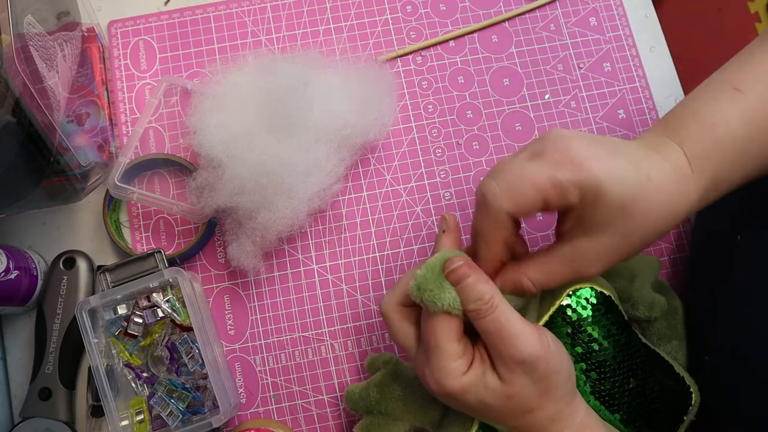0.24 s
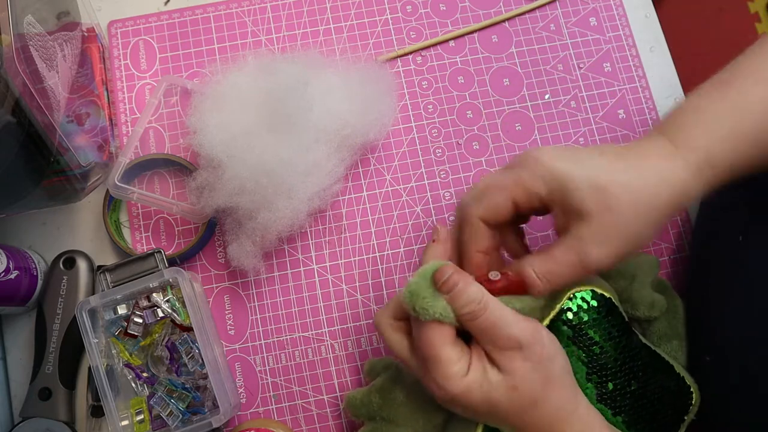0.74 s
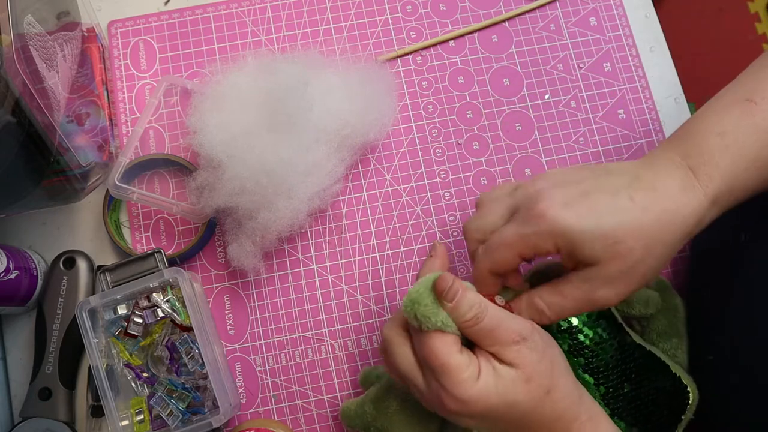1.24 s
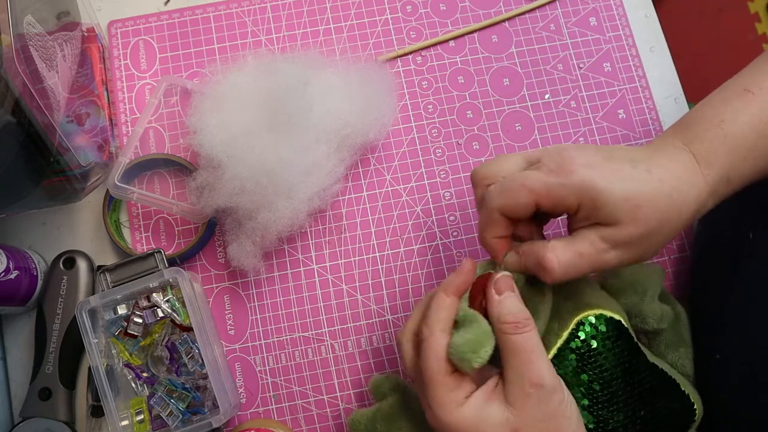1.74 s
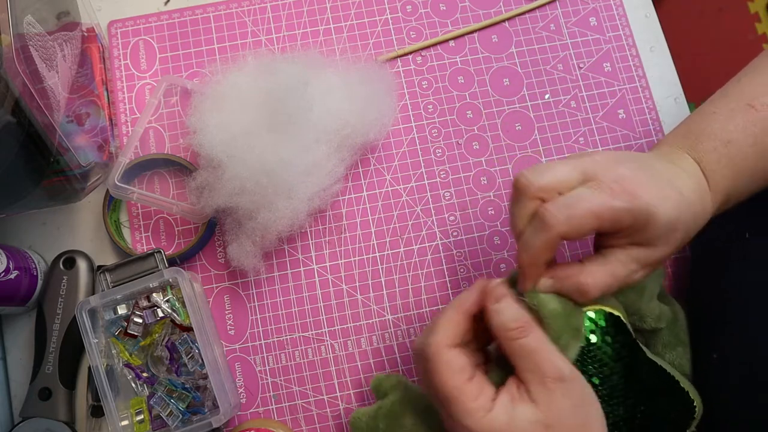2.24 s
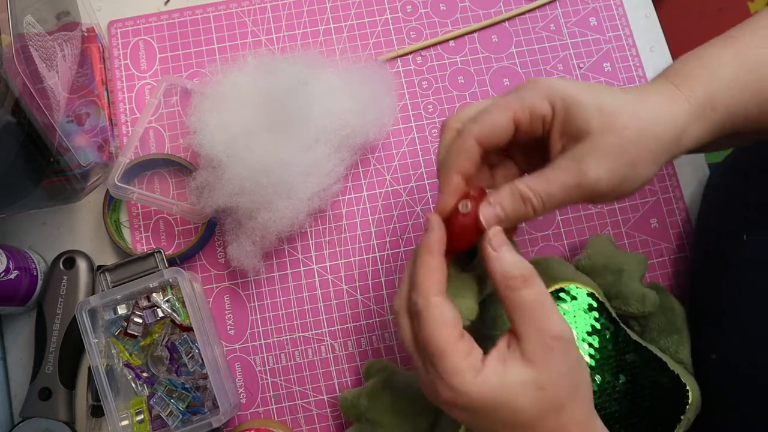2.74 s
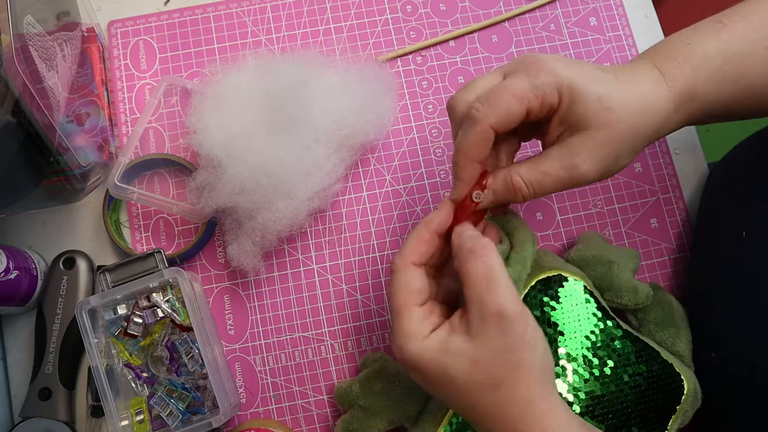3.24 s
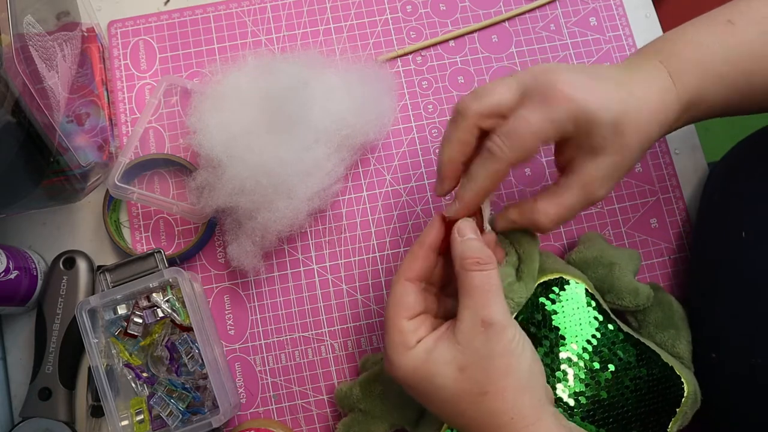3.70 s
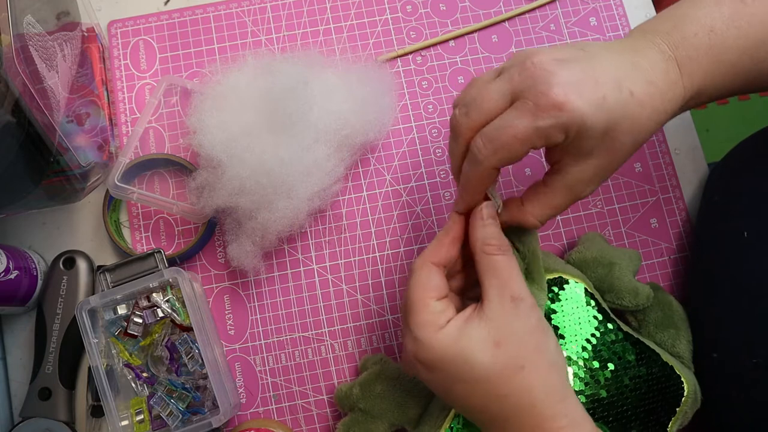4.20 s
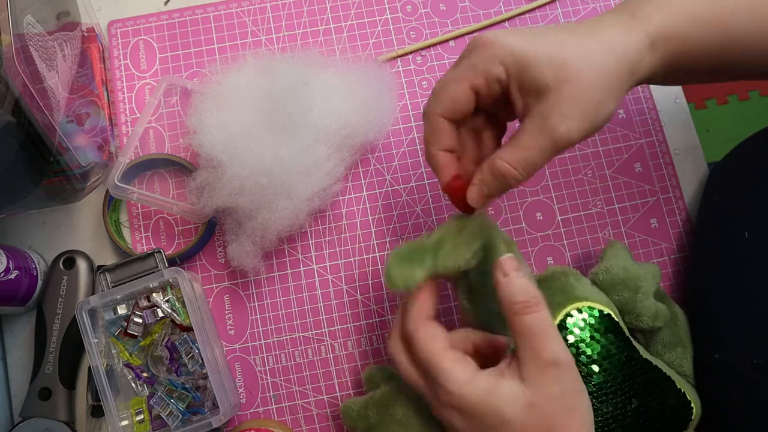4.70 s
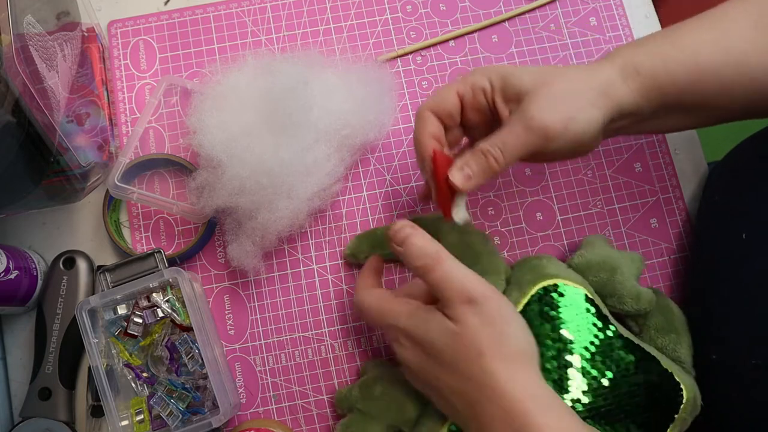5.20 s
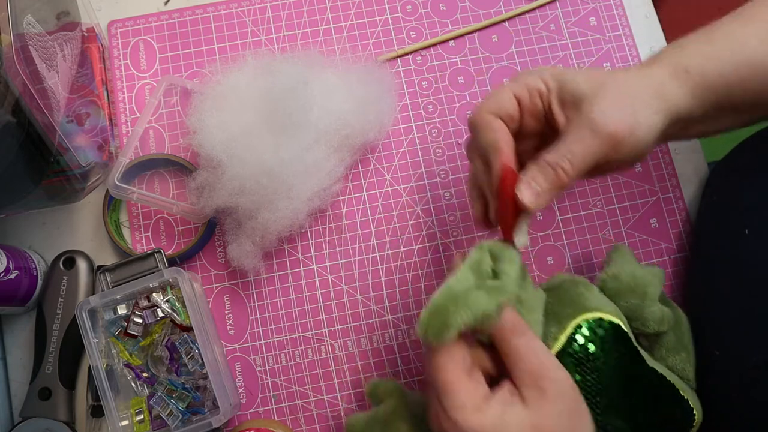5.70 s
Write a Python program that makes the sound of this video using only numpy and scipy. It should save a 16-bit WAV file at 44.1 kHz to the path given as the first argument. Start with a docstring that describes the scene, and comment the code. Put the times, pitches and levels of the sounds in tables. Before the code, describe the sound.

Brief sharp toy squeaks around fingers handling plush and plastic, with faint ticks and fumbling, above a constant low ventilation-like drone.

```python
"""In a small humming room, a toy squeaker is pinched four times close to the microphone; the third runs into a squeal.
Its reed chops the air into sharp pulses that ring the little housing, and leaks hiss where it runs rough.
Plush fabric rustles as noise broken into tiny grains; a plastic clip and the table tick as brief decaying rings.
A ventilation-like hum is shaped noise with narrow droning bands; a limiter ducks it after each squeak."""
import sys
import numpy as np
from scipy import signal
from scipy.fft import rfft, irfft
from scipy.io import wavfile
from scipy.ndimage import uniform_filter1d

SR = 44100
rng = np.random.default_rng(int(sys.argv[2]) if len(sys.argv) > 2 else 0)


def waveform_to_disk(signal):
    """Save audio, clipped to [-1, 1], as 16-bit WAV at the path in sys.argv[1]."""
    frames = np.transpose(np.atleast_2d(signal))
    scaled = np.clip(frames, -1, 1) * 32767
    samples = np.round(scaled).astype(np.int16)
    wavfile.write(sys.argv[1], SR, samples)


N = 262395
TIME = np.arange(N) / SR
TOP_HZ = 15900  # upper limit of the reed's partials and of the recorder


def undb(db):
    """Level law: decibels to amplitude gain."""
    return 10 ** (np.asarray(db) / 20)


def unit(x):
    """Normalisation: scale to rms 1."""
    return x / np.sqrt(np.mean(x ** 2) + 1e-18)


def gains(points, size):
    """Spectral envelope: the gain at each transform bin, interpolated in dB over log frequency."""
    point_hz, point_db = np.transpose(points)
    bin_hz = np.fft.rfftfreq(size, 1 / SR)
    return undb(np.interp(np.log(bin_hz + 1), np.log(point_hz), point_db))


def coloured(points, size):
    """Coloured noise: white noise weighted by a spectral envelope, at rms 1."""
    spectrum = rfft(rng.standard_normal(size))
    return unit(irfft(spectrum * gains(points, size), size))


def ring(x, hz, width_hz):
    """Resonance: one damped mode passes a band around its own frequency."""
    quality = max(hz / width_hz, 1)
    return signal.lfilter(*signal.iirpeak(min(hz, SR / 3), quality, SR), x)


def wander(shape, size):
    """Random modulation: smooth noise of spread 1 that changes over `size` samples."""
    smooth = uniform_filter1d(rng.standard_normal(shape), size)
    return unit(uniform_filter1d(smooth, size))


def add(out, start_s, x):
    """Superposition: mix a sound in at its start time."""
    i = int(start_s * SR)
    out[i:i + len(x)] += x[:len(out) - i]


# spectral density of the room's moving air: pitch_hz [Hz], relative_level_db [dB]
AIR = [(25, -24.5), (42, -22), (72, -4.5), (88, -12), (115, 1.5), (165, 0), (210, -1), (300, -9.5),
       (400, -12.5), (700, -23), (1200, -25.5), (2500, -35.5), (8500, -43.5), (15500, -48)]
AIR_DB = -36.5
# drone bands: centre_hz [Hz], half_width_hz [Hz, half of each resonance's bandwidth], level_db [dB]
DRONES = [(125.07, 6.5, -35.5), (153, 30, -41), (241.1, 16.1, -43), (298.2, 10, -51.5), (435.6, 17, -58),
          (529.8, 20.2, -58)]


def ventilation():
    """Narrow-band noise: moving air rumbles while a few low resonances drone and waver."""
    drone = np.zeros(N)
    for hz, half_width_hz, db in DRONES:
        once = ring(rng.standard_normal(N), hz, 2 * half_width_hz)
        drone += undb(db) * unit(ring(once, hz, 2 * half_width_hz))
    return drone + undb(AIR_DB) * coloured(AIR, N)


# hiss of contact and fibres, shared with the ticks: pitch_hz [Hz], relative_level_db [dB]
HISS = [(500, 4), (2000, -11.5), (5000, -3), (8500, -4), (10000, -10), (15000, -62)]
RUB_WIDTH_SHARE = 1.1  # bandwidth of each resonance over its centre


def fibres(size, hz, treble_db, grain_db=2.5):
    """Stick-slip friction: fibres catch and slip in tiny grains of noise."""
    grains = unit(undb(grain_db * wander(size, size=90)))
    width_hz = hz * RUB_WIDTH_SHARE
    body = unit(ring(ring(rng.standard_normal(size), hz, width_hz), hz, width_hz))
    return (body + undb(treble_db) * coloured(HISS, size)) * grains


# strokes of fingers and plush: middle_s [s], half_length_s [s, from the middle to 1/e],
# level_db [dB], centre_hz [Hz], treble_db [dB, hiss over body]
RUBS = [(0.103, 0.0081, -36, 1110, -12), (0.487, 0.05, -52.5, 2160, -12), (0.591, 0.024, -42, 1140, -18),
        (0.643, 0.013, -37.5, 1600, -12), (0.782, 0.024, -43, 1400, -6.5), (0.978, 0.039, -51.5, 3020, 1),
        (1.461, 0.076, -51, 1210, -1), (3.267, 0.043, -52.5, 6700, -24), (3.634, 0.02, -44.5, 4100, -3),
        (4.273, .072, -60, 3900, -4), (4.537, .03, -56.5, 2500, -2.5), (5.174, 0.035, -61.5, 4940, 8.5),
        (5.393, .03, -43.5, 890, -10), (5.505, 0.03, -51.5, 1490, -5), (5.834, 0.063, -48, 753, -5.5)]
# faint fumbling that runs throughout
FUMBLE_DB, FUMBLE_HZ, FUMBLE_TREBLE_DB, FUMBLE_SWELL_DB = -64.5, 1900, -4.5, 3


def rustle():
    """Envelope-modulated friction: strokes swell and fade over faint, random fumbling."""
    swell = unit(undb(FUMBLE_SWELL_DB * wander(N, size=4400)))
    out = undb(FUMBLE_DB) * swell * fibres(N, FUMBLE_HZ, FUMBLE_TREBLE_DB)
    for middle_s, half_s, db, hz, treble_db in RUBS:
        t = np.arange(-2 * half_s, 2 * half_s, 1 / SR)
        stroke = fibres(len(t), hz, treble_db) * np.exp(-(t / half_s) ** 2)
        add(out, max(middle_s - 2 * half_s, 0), undb(db) * stroke)
    return out


CLIMB_HZ_PER_S = 6000  # while the fingers press, the pitch climbs to its top
# as they ease off, the reed goes flat, fades ever faster, roughens and stalls
EASE_FLAT_HZ_PER_S, EASE_FADE_DB, EASE_FADE_POWER, STALL_ROUGH = 10500, 25.5, 1.36, 0.29


def pinch(start_s, press_s, ease_s, top_hz, db, rough):
    """Pressure-driven pitch: rows of (s, Hz, dB, roughness) as pressure builds, then eases to a stall."""
    t = np.arange(0, press_s + ease_s, 1 / SR)
    eased = np.maximum(t - press_s, 0) / ease_s
    climb_hz = CLIMB_HZ_PER_S * np.maximum(press_s - t, 0)
    flat_hz = EASE_FLAT_HZ_PER_S * ease_s * eased
    level_db = db - EASE_FADE_DB * eased ** EASE_FADE_POWER
    return np.column_stack([start_s + t, top_hz - flat_hz - climb_hz, level_db, rough + STALL_ROUGH * eased])


# the long squeal that the third pinch runs into:
# time_s [s], pitch_hz [Hz], relative_level_db [dB, before SQUEAL_GAIN_DB]
SQUEAL = [(2.062, 2145, -0.5), (2.064, 1856, -11), (2.07, 1414, -6), (2.076, 1216, -13), (2.084, 1128, -13),
          (2.12, 979, -21), (2.136, 1010, -17), (2.148, 1063, -11.5), (2.16, 1267, -8.5),
          (2.168, 1132, -15), (2.177, 936, -29)]
SQUEAL_GAIN_DB = 6.5
GLIDE_ROUGH, MAX_ROUGH = 0.015, 0.32  # roughness per octave a second, and its limit


def held_squeeze():
    """Glide instability: the same rows for the squeal; the faster its pitch slides, the rougher the reed."""
    s, hz, db = np.transpose(SQUEAL)
    octaves_per_s = np.abs(np.gradient(np.log2(hz), s))
    rough = np.minimum(GLIDE_ROUGH * octaves_per_s, MAX_ROUGH)
    return np.column_stack([s, hz, db + SQUEAL_GAIN_DB, rough])


def response(points, size=512):
    """Minimum phase: causal impulse response of a body with a given spectrum, by folding its cepstrum."""
    cepstrum = irfft(np.log(gains(points, size)))
    cepstrum[1:size // 2] *= 2
    cepstrum[size // 2 + 1:] = 0
    return irfft(np.exp(rfft(cepstrum)))


REED_JITTER, REED_LEAK = .034, .52  # pitch spread and hiss gain, both growing with roughness
SWING_UP_S = .0008  # time constant of the reed's growth from rest
TOY_LOW_HZ = 714.7  # the small toy radiates next to nothing below this


def squeak(curve, colour, flicker_db, sag=0., settle_s=0.015, puff=0.):
    """Self-excited reed: it swings up, then slaps shut once a cycle, unevenly and with hiss when rough."""
    s, *columns = np.transpose(curve)
    sounding = (TIME > s[0] - 5 * SWING_UP_S) & (TIME < s[-1])
    t = TIME[sounding]
    hz, db, rough = (np.interp(t, s, column) for column in columns)
    jitter = 1 + REED_JITTER * rough * wander(len(t), size=30)
    cycles = np.cumsum(hz * jitter) / SR
    k = np.arange(1, 24)[:, None]  # partial numbers
    housing = response(colour)
    # with sag, the housing's resonances start low and rise as it is pressed smaller
    heard_at_hz = k * hz * (1 + sag * np.exp(-np.maximum(t - s[0], 0) / settle_s))
    housing_hz = np.fft.rfftfreq(len(housing), 1 / SR)
    partials = np.interp(heard_at_hz, housing_hz, rfft(housing)) * (k * hz < TOP_HZ)
    # flicker grows with partial number up to the seventh
    partials *= undb(flicker_db * np.minimum(k / 7, 1) * wander(partials.shape, size=300))
    waves = (partials * np.exp(2j * np.pi * k * cycles)).real
    # a bright jet of air escapes with each slap
    jet = np.diff(rng.standard_normal(len(t) + 1)) * (1 + np.cos(2 * np.pi * cycles))
    hiss = unit(signal.fftconvolve(jet, housing)[:len(t)])
    voice = unit(waves.sum(axis=0)) + REED_LEAK * np.sqrt(np.abs(rough)) * hiss
    # the squeeze sets the power, whichever resonance the pitch happens to meet
    voice /= np.sqrt(uniform_filter1d(voice ** 2, size=265))
    # before it first touches its seat the reed is a pure, fast-growing tone
    swing = .5 * unit(waves[0]) * np.exp(np.minimum(t - s[0], 0) / SWING_UP_S)
    out = np.zeros(N)
    out[sounding] = np.where(t < s[0], swing, voice) * undb(db)
    radiation = signal.butter(3, TOY_LOW_HZ, "high", fs=SR, output="sos")
    out = signal.sosfilt(radiation, out + 1e-18)
    # the puff of air also nudges the microphone
    out[sounding] += puff * np.hanning(len(t)) * undb(db)
    return out


# pinches; the third overblows the reed: start_s [s], press_s [s], ease_s [s], top_pitch_hz [Hz],
# level_db [dB], roughness [0-1, before easing]
PINCHES = [(0.0514, 0.0008, 0.024, 1107, 0, 0.12), (2.021, 0.0063, 0.019, 1075, -0.5, 0.25),
           (2.053, .007, 0.0093, 1175, 1, 0.47), (2.9176, .0135, .026, 1056, -1, 0.07)]
# the housing's resonances, which change with the grip: pitch_hz [Hz], relative_level_db [dB]
FIRST_COLOUR = [(500, -6.5), (1050, -1.5), (2100, -4), (3100, -8), (4200, -10), (6000, -18), (7200, -24.5),
                (8300, -11.5), (9300, 6.5), (10800, -19.5), (12400, 0), (15500, -22.5)]
SECOND_COLOUR = [(500, -32), (1030, 0), (2100, -3.5), (3100, -5), (5100, -9.5), (7300, 0), (8400, -3),
                 (9400, -8), (10600, -7.5), (12600, -3.5), (13800, -21), (15800, -9.5)]
OVERBLOWN_COLOUR = [(500, -26.5), (1150, -13.5), (2300, 3.5), (3450, -7), (4600, -6.5), (6500, -40),
                    (8050, -3), (9200, -8), (10800, -23), (12600, -7), (15500, -29)]
LAST_COLOUR = [(450, -35), (800, 12.5), (1050, -2), (2100, -3), (3100, -3), (5100, -7), (7300, -1),
               (8400, -2), (9500, 1.5), (10600, -12.5), (12400, -0.5), (13800, -11), (15800, -20)]
SQUEAL_COLOUR = [(500, -12.5), (1100, 3), (1300, -2.5), (1650, -0.5), (1950, -12.5), (2300, -5),
                 (3200, -9.5), (4400, -12), (5600, -23.5), (7000, -31.5), (8200, -11), (9800, -1),
                 (11200, -15.5), (12400, -14), (15500, -24)]
CHIRP_FLICKER_DB, SQUEAL_FLICKER_DB = 2.7, 3.8  # of the upper partials


def squeaker():
    """Reed-resonator coupling: chirps, and a swooping squeal that starts overblown near the octave."""
    out = squeak(held_squeeze(), SQUEAL_COLOUR, SQUEAL_FLICKER_DB, sag=0.046)
    grips = FIRST_COLOUR, SECOND_COLOUR, OVERBLOWN_COLOUR, LAST_COLOUR
    for row, colour in zip(PINCHES, grips):
        out += squeak(pinch(*row), colour, CHIRP_FLICKER_DB, puff=0.027)
    return out


# start_s [s], peak_level_db [dB], ring_hz [Hz], treble_db [dB, crack over ring]
TICKS = [(.110, -20.5, 1150, -28), (.226, -25, 2400, -15), (.611, -22.5, 1470, -6.5),
         (0.627, -20.5, 1100, -18), (.6386, -15.5, 1480, -19), (2.421, -33, 6200, -9),
         (3.142, -27.5, 5000, 22), (3.240, -33, 830, -11), (4.254, -28.5, 7000, 9),
         (4.473, -34.5, 1096, -13), (4.561, -32, 613, -22), (5.372, -21.5, 560, -25),
         (5.374, -32, 2900, -23), (5.866, -30, 600, -18.5)]
# 60 dB decay time of a contact that rings at 1 kHz; higher ones die sooner
TICK_T60_S, TICK_T60_SLOPE = 0.013, 0.33


def ticks(width_share=0.56, snap=3.5):
    """Impact excitation: a snap and a short scrape ring a damped mode under a bright crack."""
    out, t = np.zeros(N), TIME[:SR // 10]
    for start_s, db, hz, treble_db in TICKS:
        t60_s = TICK_T60_S * (1000 / hz) ** TICK_T60_SLOPE
        contact = rng.standard_normal(len(t)) + snap * (t == 0)
        body = unit(ring(ring(contact, hz, hz * width_share), hz, hz))
        crack = undb(treble_db) * coloured(HISS, len(t))
        tick = (body + crack) * np.exp(-np.log(1000) * t / t60_s)
        add(out, start_s, undb(db) * tick / np.abs(tick).max())
    return out


ROOM_T60_S, ROOM_DB = 0.15, -26.5


def room(x, table_db=-15, table_s=0.0038, wall_s=0.022, dull_hz=9000):
    """Reverberation: quick scatter from table and hands, then the faint tail of a furnished room."""
    t = TIME[:SR // 2]
    near = rng.standard_normal(len(t)) * np.exp(-t / table_s) * (1 - np.exp(-t / table_s))
    decay = np.exp(-np.log(1000) * t / ROOM_T60_S)
    tail = rng.standard_normal(len(t)) * decay * (1 - np.exp(-t / wall_s))
    tail = signal.lfilter(*signal.butter(1, min(dull_hz, SR / 3), fs=SR), tail)
    echoes = undb(table_db) * near / np.linalg.norm(near)
    echoes += undb(ROOM_DB) * tail / np.linalg.norm(tail)
    return x + signal.fftconvolve(x, echoes)[:N]


def scene():
    """Superposition: squeaker and handling echo in the room, over its steady hum."""
    handling = rustle() + ticks()
    return (room(squeaker() + handling) + ventilation())[None]


def limiter(x, ceiling_db=-7, release_s=0.25):
    """Peak-hold gain control: gain falls at once when the power passes the ceiling, and creeps back."""
    envelope = np.sqrt(np.abs(uniform_filter1d(x ** 2, size=88)) + 1e-18)
    # a running maximum in log level, tilted so that each peak decays exponentially
    fade = TIME / release_s
    held = np.exp(np.maximum.accumulate(np.log(envelope) + fade, axis=-1) - fade)
    return x * np.minimum(1, undb(ceiling_db) / held)


def record(dry):
    """Limiting and saturation: the recorder ducks the squeaks, rounds tall spikes and cuts the top."""
    limited = limiter(dry)
    rounded = limited / (1 + (limited / .88) ** 4) ** (1 / 4)
    return signal.sosfilt(signal.ellip(10, .2, 70, TOP_HZ, fs=SR, output="sos"), rounded)


dry = scene()
out = record(dry)
waveform_to_disk(out)
```